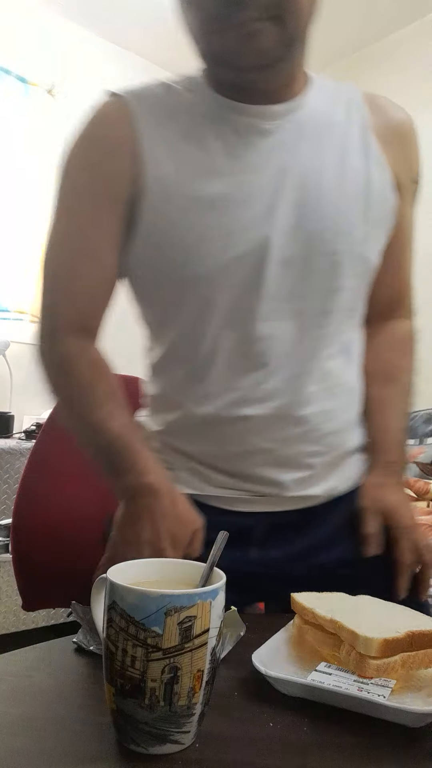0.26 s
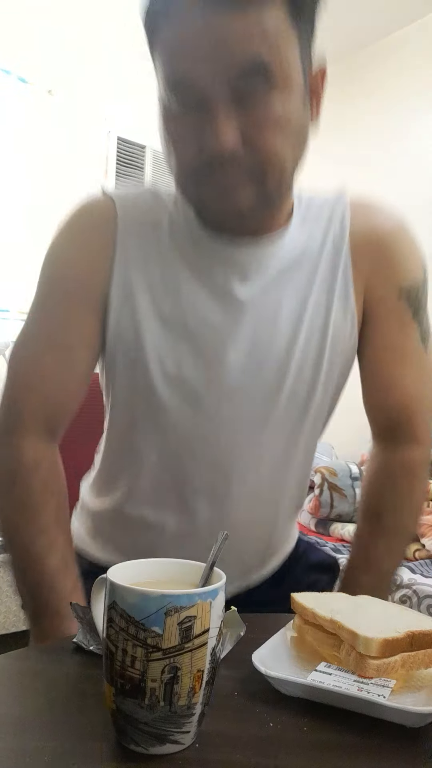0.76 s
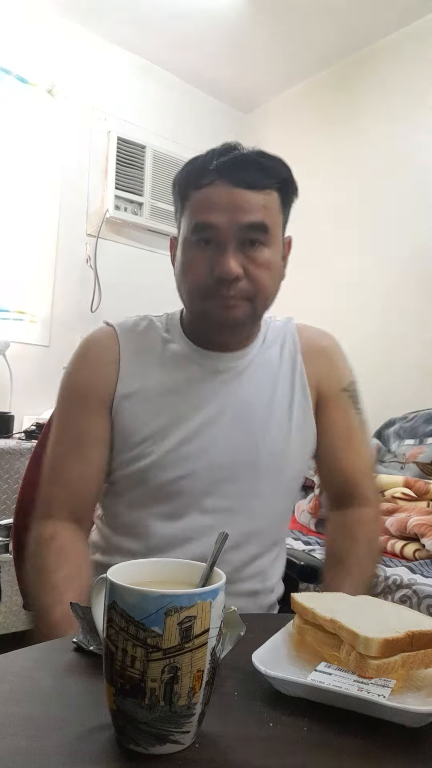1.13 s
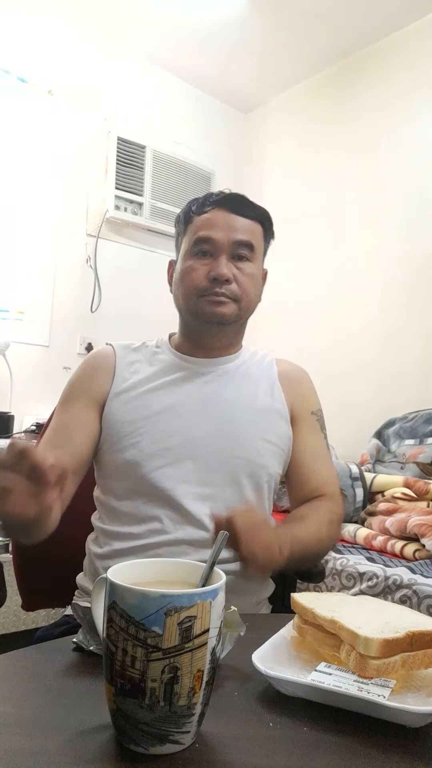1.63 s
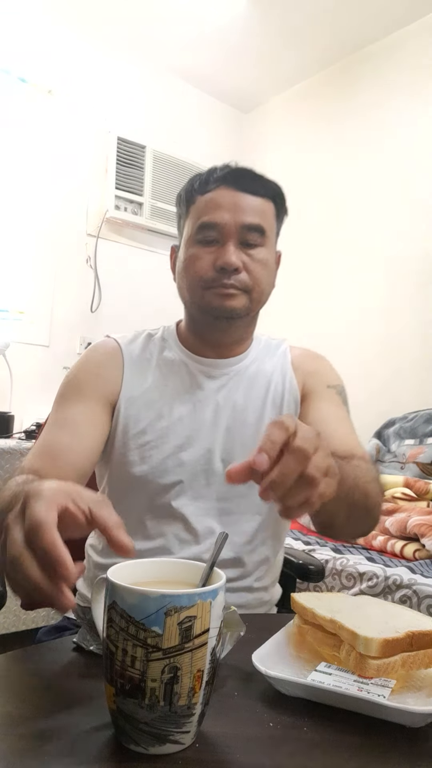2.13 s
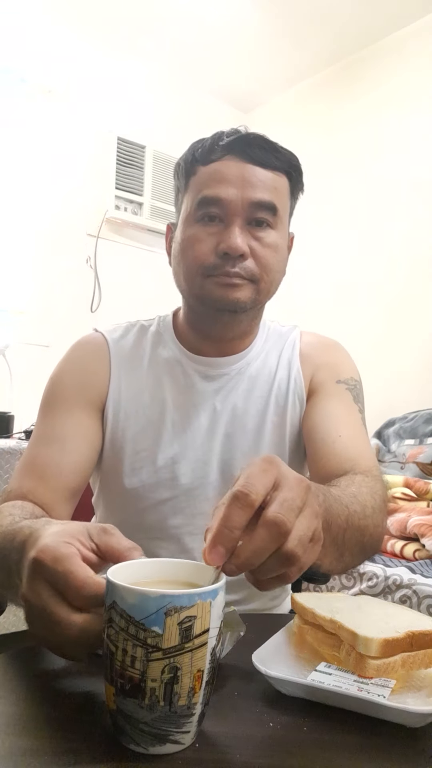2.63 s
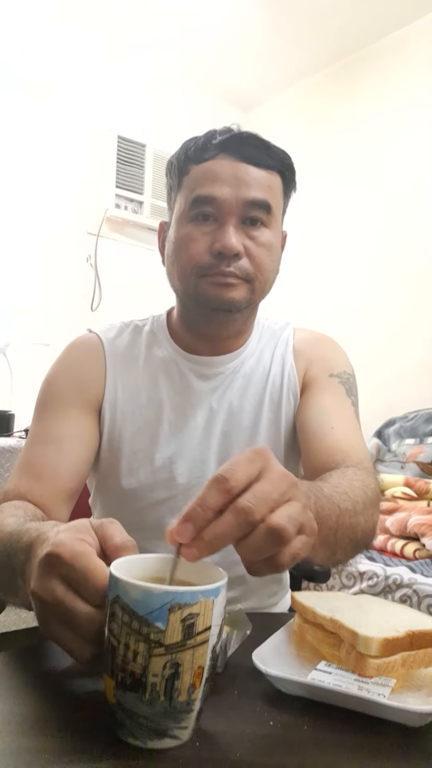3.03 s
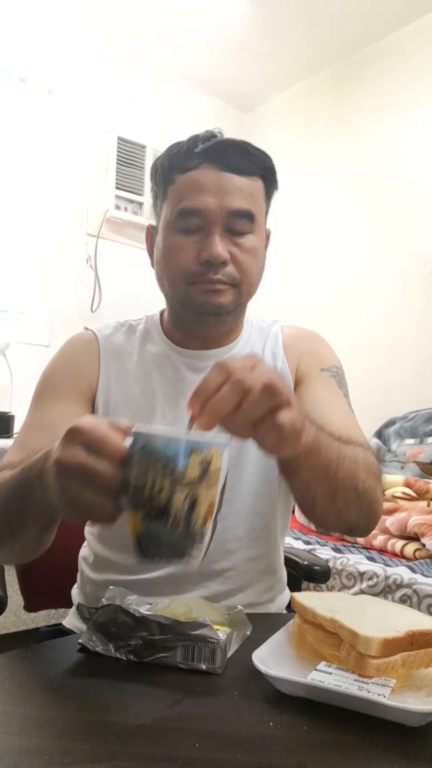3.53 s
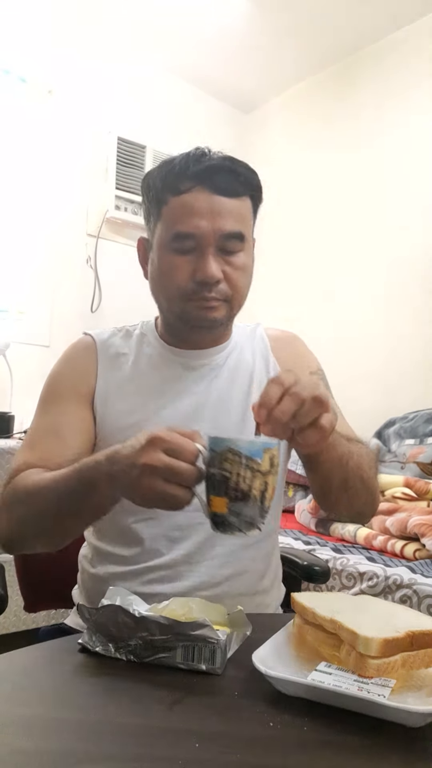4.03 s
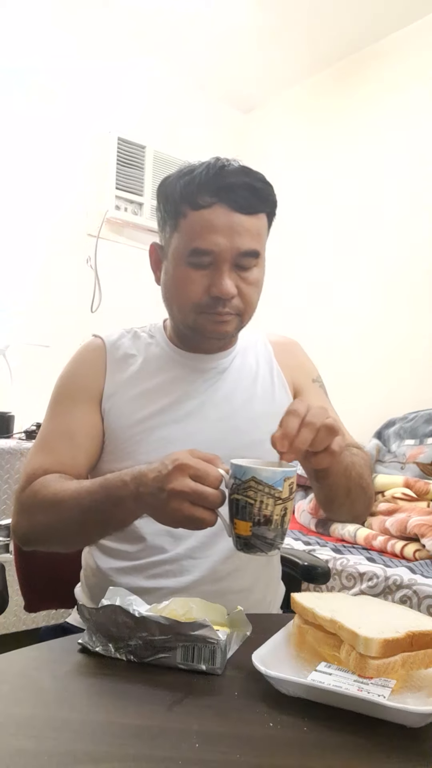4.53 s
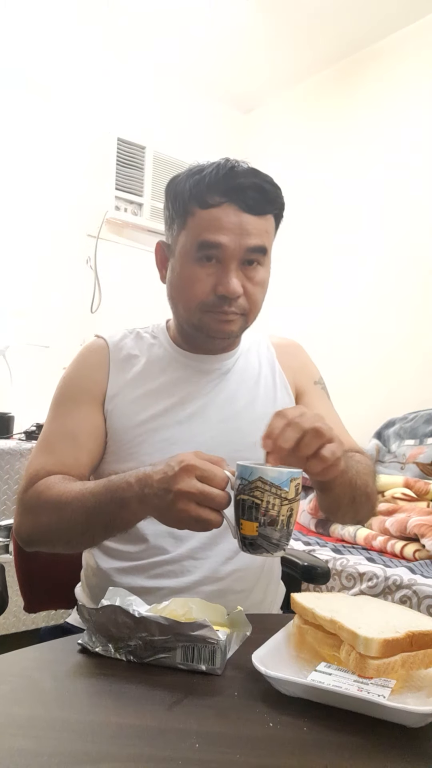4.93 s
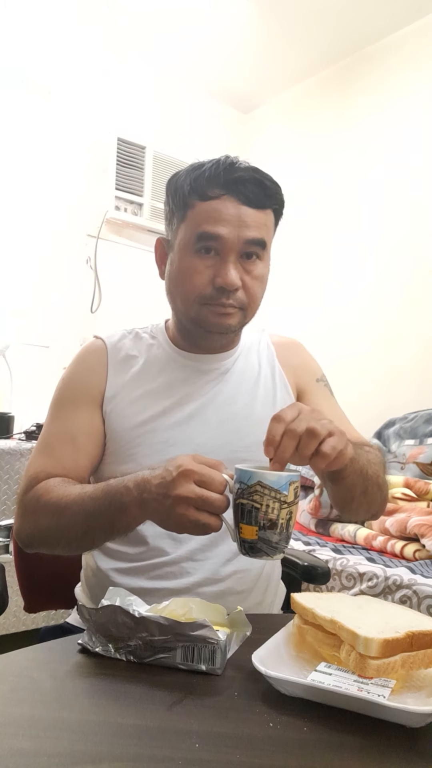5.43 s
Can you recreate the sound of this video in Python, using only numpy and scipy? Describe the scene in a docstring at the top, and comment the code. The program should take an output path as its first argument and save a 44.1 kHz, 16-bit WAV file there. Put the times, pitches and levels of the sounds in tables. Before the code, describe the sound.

A metal spoon clinks lightly in a ceramic mug, after clothes rustle and a chair knocks, over a low air conditioner hum.

```python
"""A metal spoon clinks lightly in a ceramic mug of coffee: each touch is a hard tick and a short ring.
First a man sits down in a small bedroom: his clothes rustle and the chair knocks under him.
The mug slides and bumps on the table, then he lifts it and stirs, his grip damping the ring.
Air conditioning hums throughout; two motors at nearly the same speed make the hum throb."""
import sys
import numpy as np
from scipy import signal
from scipy.fft import rfft, irfft
from scipy.io import wavfile
from scipy.ndimage import uniform_filter1d

SR = 44100
rng = np.random.default_rng(int(sys.argv[2]) if len(sys.argv) > 2 else 0)


def output_pcm(signal):
    """Save a mono or channel-first signal as 16-bit PCM at the path in sys.argv[1].

    Samples are clipped to [-1, 1] before scaling.
    """
    pcm = np.clip(np.atleast_2d(signal).T, -1, 1) * 32767
    wavfile.write(sys.argv[1], SR, np.round(pcm).astype(np.int16))


N = 249606
TIME = np.arange(N) / SR


def from_db(db):
    """Decibels to gain."""
    return 10 ** (np.asarray(db) / 20)


def unit_rms(x):
    """Scale to rms 1."""
    return x / np.sqrt(np.mean(x ** 2) + 1e-20)


def at_time(rows, times=TIME):
    """Read the columns of an automation curve at the given times."""
    known_s, *columns = np.transpose(rows)
    return [np.interp(times, known_s, column) for column in columns]


def at_hz(points, hz):
    """Read a curve on a log-frequency axis."""
    known_hz, values = np.transpose(points)
    return np.interp(np.log(np.maximum(hz, 1)), np.log(known_hz), values)


def tilted(colour, db_per_octave):
    """Brighten or darken a spectrum around 1 kHz."""
    return [(hz, db + db_per_octave * np.log2(hz / 1000)) for hz, db in colour]


def add(track, start_s, sound):
    """Mix a sound into a track from start_s on."""
    start = round(start_s * SR)
    track[..., start:start + sound.shape[-1]] += sound[..., :N - start]


def panned(x, pan_db):
    """Constant-power pan; negative is to the right."""
    gains = from_db(np.array([[pan_db], [-pan_db]]) / 2)
    return x * unit_rms(gains)


def stroke(start_s, length_s, attack_s, release_s):
    """Envelope of one rubbing movement: it swells, holds and dies away."""
    early_s = np.maximum(start_s - TIME, 0)
    late_s = np.maximum(TIME - start_s - length_s, 0)
    return np.exp(-np.minimum(early_s / attack_s + late_s / release_s, 20))


def power_sum(envelopes):
    """Unrelated movements add in power."""
    return np.sqrt(sum(envelope ** 2 for envelope in envelopes))


# Stereo image of diffuse sound: frequency_hz, left_right_correlation
STEREO_CORRELATION = [(60, 0.48), (150, 0.82), (300, 0.67), (600, 0.36), (1200, 0), (16000, 0)]

def diffuse_noise(colour, size=N):
    """Coloured stereo noise at rms 1, narrow in the bass and wide in the treble."""
    hz = np.arange(size // 2 + 1) * SR / size
    mid, side = rfft(rng.standard_normal((2, size)))
    correlation = at_hz(STEREO_CORRELATION, hz)
    stereo = np.sqrt(1 + correlation) * mid + np.sqrt(1 - correlation) * side * [[1], [-1]]
    return unit_rms(irfft(stereo * from_db(at_hz(colour, hz)), size))


# Shaft speeds: slow_motor_hz, fast_motor_hz
MOTOR_HZ = (57.97, 58.83)
# Motor hum: harmonic_number, slow_motor_db, fast_motor_db, beat_peak_s
HUM_HARMONICS = [(1, -54.5, -52, 1.136), (2, -51, -52.5, .349), (3, -67.5, -63.5, .41)]
# Fan rumble and faint hiss: frequency_hz, density_db
FAN_COLOUR = [(25, -23), (40, -24), (52, 11), (82, 4), (105, 5), (200, -10.5), (300, -6.5), (480, -14),
              (800, -24.5), (1600, -34), (3000, -37), (9000, -39), (13000, -33), (15700, -29.5)]

def air_conditioner(fan_db=-54.5, hum_pan_db=-1.0, fan_pan_db=-2.5):
    """Over the fan's rumble, each motor harmonic beats at its own multiple of the speed difference."""
    hum = 0
    for harmonic, slow_db, fast_db, beat_peak_s in HUM_HARMONICS:
        shared_phase = rng.uniform(0, 2 * np.pi)
        for motor_hz, level_db in zip(MOTOR_HZ, (slow_db, fast_db)):
            phase = 2 * np.pi * harmonic * motor_hz * (TIME - beat_peak_s) + shared_phase
            hum = hum + np.sqrt(2) * from_db(level_db) * np.sin(phase)
    fan = from_db(fan_db) * diffuse_noise(FAN_COLOUR)
    return panned(hum, hum_pan_db) + panned(fan, fan_pan_db)


def rubbing(colour, grain_db, grain_samples=150):
    """Two surfaces slide over each other, catching unevenly."""
    catches = unit_rms(uniform_filter1d(rng.standard_normal(N), size=grain_samples))
    return from_db(grain_db * catches) * diffuse_noise(colour)


# Tone of the cloth: frequency_hz, density_db
CLOTH_COLOUR = [(200, 5.5), (1000, -3.5), (2000, 3.5), (4500, 2), (7300, 1), (8300, -6), (10000, -5.5),
                (12000, -0.5), (15500, -8)]
# He steps up, sits down and raises his arms: start_s, length_s, level_db, tilt_db_per_octave
RUSTLES = [(0.041, 0.41, -60, -1.5), (0.273, 0.049, -52.5, 1), (0.506, 0.018, -45, -1),
           (0.616, 0.33, -61, 2.5), (0.98, 0.13, -57.5, 3), (1.177, 0.17, -60, -1),
           (1.384, 0.35, -67.5, 4.5), (1.63, 0.25, -65, 1.5), (1.926, 0.03, -58, 2),
           (2.252, 0.048, -71.5, -1)]

def clothes(attack_s=0.025, release_s=0.037, pan_db=-2.0):
    """Cloth slides over cloth and seat: long airy strokes and a few quick swishes."""
    out = 0
    for start_s, length_s, level_db, tilt in RUSTLES:
        envelope = from_db(level_db) * stroke(start_s, length_s, attack_s, release_s)
        out = out + envelope * rubbing(tilted(CLOTH_COLOUR, tilt), grain_db=0.7)
    return panned(out, pan_db)


def detuned(modes, spread):
    """A changing load shifts every mode a little, differently at each blow."""
    hz, db, t60_s = np.transpose(modes)
    return np.transpose([hz * (1 + spread * rng.standard_normal(len(hz))), db, t60_s])


def ringing(modes, colour, decay_scale=1, scatter_db=5.5, size=SR // 3):
    """A struck body: each blow sets every mode going with a strength of its own."""
    t = np.arange(size) / SR
    hz, db, t60_s = np.transpose(modes)
    strengths = from_db(db + at_hz(colour, hz) + scatter_db * rng.standard_normal(len(hz)))
    polarities = rng.choice([-1, 1], len(hz))
    decay = np.exp(-np.log(1000) * t / (t60_s[:, None] * max(decay_scale, 0.05)))
    return (strengths * polarities) @ (np.sin(2 * np.pi * hz[:, None] * t) * decay)


def contact_noise(colour, contact_s, size=SR // 3):
    """A rough contact makes a burst of noise; the longer the contact, the softer its attack."""
    t = np.arange(size) / SR
    hz = np.arange(size // 2 + 1) * SR / size
    noise = irfft(rfft(rng.standard_normal(size)) * from_db(at_hz(colour, hz)), size)
    return noise * np.exp(-t / contact_s) * (1 - np.exp(-4 * t / contact_s))


# EQ centres of a dull blow: bass_hz, middle_hz, presence_hz, treble_hz
BLOW_BANDS_HZ = (270, 900, 2300, 5500)

def dull_blows(blows, modes, ring_db, scuff_db, scuff_tilt, arch_db, detune):
    """Mid-heavy blows on furniture: a scuff and the body's short ring. Long, soft contacts ring less."""
    out = np.zeros(N)
    mid_arch = [(hz, -arch_db * np.log2(hz / 1000) ** 2) for hz in BLOW_BANDS_HZ]
    for start_s, level_db, tilt, contact_s in blows:
        colour = tilted(mid_arch, tilt)
        hardness = 1 / np.hypot(1, contact_s / 0.019)
        ring = hardness * ringing(detuned(modes, detune), colour)
        add(out, start_s, from_db(level_db + ring_db) * ring)
        bands = tilted(colour, scuff_tilt)
        scuff_colour = [(90, bands[0][1] - 22), *bands, (14000, bands[-1][1] - 17)]  # ends roll off
        add(out, start_s, from_db(level_db + scuff_db) * contact_noise(scuff_colour, contact_s))
    return out


# Resonances of the chair: pitch_hz, level_db, t60_s
CHAIR_MODES = [(245, -7, .1), (320, -3, .08), (400, -5, .05), (470, -8, .07), (522, -7, .13),
               (563, -4, .14), (650, -9, .04), (900, -11, .04), (1054, -6, .05), (1104, -1, .11),
               (1195, -7, .06), (1330, -8, .04), (1750, -11, .025), (2050, -6, .03), (2401, -6, .045),
               (2690, -10, .035), (4113, -7, .035)]
# Knocks as he settles: start_s, relative_level_db, tilt_db_per_octave, contact_s
CHAIR_KNOCKS = [(.960, -44.5, -5.5, 0.035), (1.104, -30, -.5, 0.0074), (1.193, -39, -2, 0.019),
                (1.210, -52, -15.5, 0.005), (1.229, -36, -3.5, 0.0095), (1.246, -46, 6.5, .017),
                (1.379, -43.5, -2, 0.014), (1.510, -53, -7, 0.01)]

def chair(room, direct_db=-2, room_db=-5, pan_db=-2.5):
    """The chair knocks as it takes his weight, and the walls answer."""
    knocks = dull_blows(CHAIR_KNOCKS, CHAIR_MODES, ring_db=-6.5, scuff_db=12.0,
                        scuff_tilt=-2.5, arch_db=2.0, detune=0.027)
    return panned(from_db(direct_db) * knocks + from_db(room_db) * reverb(knocks, room), pan_db)


# Reverb time of the bedroom: frequency_hz, t60_s
ROOM_DECAY = [(150, 0.58), (1000, 0.37), (3000, 0.35), (6000, 0.25), (14000, 0.06)]

def room_response(predelay_s, size=SR // 2):
    """Dense reflections from near walls, dying faster in the treble; unit energy."""
    t = np.arange(size) / SR
    hz = np.arange(size // 2 + 1) * SR / size
    white = rfft(diffuse_noise([(1, 0), (SR, 0)], size=size))
    log_centres = np.log([centre_hz for centre_hz, _ in ROOM_DECAY])
    tail = 0
    for band_weights, (_, t60_s) in zip(np.eye(len(log_centres)), ROOM_DECAY):
        band = irfft(white * np.interp(np.log(hz + 1), log_centres, band_weights), size)
        tail = tail + band * from_db(-60 * t / t60_s)
    fade_in = np.clip(t / predelay_s - 1, 0, 1)
    return unit_rms(tail * fade_in) / np.sqrt(size)


def reverb(x, room):
    """What the walls send back."""
    return signal.fftconvolve(np.atleast_2d(x), room, axes=1)[:, :N]


# Tone of the mug's foot on the table: frequency_hz, density_db
SLIDE_COLOUR = [(100, -9), (200, -7), (380, -4.5), (550, -13.5), (900, -16.5), (1400, -20), (1900, -21),
                (2600, -28.5), (4800, -27.5), (8000, -37), (15000, -40)]
# Pushes of the mug: start_s, length_s, level_db
MUG_SLIDES = [(2.346, 0.034, -61.5), (2.456, 0.18, -66), (2.67, .15, -55), (2.755, 0.021, -51),
              (3.045, 0.017, -47.5)]

def mug_slides(attack_s=0.024, release_s=0.042, pan_db=-6):
    """The mug's foot rubs over the table top with a low, grainy scrape."""
    envelope = power_sum(from_db(level_db) * stroke(start_s, length_s, attack_s, release_s)
                         for start_s, length_s, level_db in MUG_SLIDES)
    return panned(envelope * rubbing(SLIDE_COLOUR, grain_db=2.0), pan_db)


# Resonances of mug and spoon, for drags and clinks alike: pitch_hz, level_db, t60_s
MUG_MODES = [(1930, -1.5, 0.045), (2150, -7, 0.041), (2080, 2.5, 0.28), (2024, -11, 0.16),
             (2340, -22, 0.051), (3920, -12, 0.088), (4240, 0, 0.027), (4760, -6, 0.042),
             (5425, 1.5, 0.047), (5550, -4, 0.14), (5626, 2, 0.083), (5620, -0.5, 0.02), (5840, -3, 0.039),
             (6400, -14, 0.044), (6970, -14, 0.13), (7450, 2, 0.041), (8160, -8, 0.069), (9600, -21, 0.093),
             (11100, -16, 0.073)]
# Drags along the mug's wall: start_s, length_s, low_ring_db, bright_ring_db
SPOON_DRAGS = [(2.52, 0.051, -74, -63), (2.589, 0.061, -56, -54), (3.19, 0.031, -55.5, -77)]

def spoon_drags(slips_per_s=500, attack_s=0.015, release_s=0.011, pan_db=-9):
    """The spoon sticks and slips on the glaze; each slip is a tiny blow on the wall, which it damps."""
    slips = (rng.random(N) < slips_per_s / SR) * rng.standard_normal(N)
    low_colour = [(1950, -21), (2080, 4), (2400, -14), (3500, -40)]
    bright_colour = [(2400, -35), (3800, -8), (4900, -8), (5550, -2), (5800, 2), (6500, -11), (9000, -14)]
    low_body = ringing(MUG_MODES, low_colour, decay_scale=0.74)
    bright_body = ringing(MUG_MODES, bright_colour, decay_scale=0.55)
    low, bright = [unit_rms(signal.fftconvolve(slips, body)[:N]) for body in (low_body, bright_body)]
    out = 0
    for start_s, length_s, low_db, bright_db in SPOON_DRAGS:
        ring = from_db(low_db) * low + from_db(bright_db) * bright
        out = out + stroke(start_s, length_s, attack_s, release_s) * ring
    return panned(out, pan_db)


# EQ centres of a clink: low_ring_hz, dry_tick_hz, bright_ring_hz, top_hz
CLINK_BANDS_HZ = (2083, 4000, 5600, 7800)
# Automation as the mug is lifted into a firm grip: time_s, reverb_send_db, decay_scale
MUG_LIFT = [(2.5, -10, 0.75), (3.3, -7.5, 0.88), (3.75, -5.5, 0.75), (4.3, 2, 0.41), (4.55, 0, 0.63),
            (4.85, -5.5, 0.27), (5.6, -7.5, 0.22)]
# Spoon taps; the spot struck colours the bright ring:
# start_s, relative_level_db, tilt_db_per_octave, bright_ring_db
SPOON_CLINKS = [(2.5666, -54.5, 7, 14.5), (2.5814, -51, 1.5, 6), (2.7217, -54.5, -5, 14),
                (2.7442, -41.5, -0.5, -1), (2.9746, -53.5, -2, 0), (3.264, -46.5, 0.5, -9.5),
                (3.3633, -55.5, -3.5, -7.5), (3.692, -70.5, 7, -9), (3.7323, -61, 2, 4.5),
                (3.7798, -69, -11, 0), (4.0148, -70.5, 7, -10), (4.263, -56.5, 4.5, -5.5),
                (4.438, -71, 9, -5), (4.5137, -54.5, 5, 5), (4.7335, -80, -2, 14), (4.8187, -61.5, -6, -3),
                (4.8862, -57.5, -0.5, 5), (5.0212, -69.5, -11, 15), (5.0474, -68.5, -10, 5),
                (5.0889, -62, -0.5, 18), (5.271, -59, 0, 10.5), (5.405, -68.5, 1, 11),
                (5.4277, -54.5, -2.5, 13.5), (5.5533, -51, -5.5, 4), (5.595, -44.5, -5.5, 8.5)]

def spoon_clinks(tick_db=14, contact_s=0.0018, slosh_detune=0.04, damped_db=-7,
                 free_tick_db=-8.0, grip_tick_db=19, pan_db=-12):
    """Steel ticks on glaze; hand and sloshing coffee damp and detune the ring and bring out the tick."""
    out = np.zeros(N)
    octaves = np.log2(np.array(CLINK_BANDS_HZ) / CLINK_BANDS_HZ[1])
    for start_s, level_db, tilt, spot_db in SPOON_CLINKS:
        _, decay_scale = at_time(MUG_LIFT, start_s)
        damping = 1 - decay_scale
        band_db = tilt * octaves + [0, free_tick_db + grip_tick_db * damping, spot_db, 0]
        modes = detuned(MUG_MODES, slosh_detune * damping ** 3)
        ring = ringing(modes, list(zip(CLINK_BANDS_HZ, band_db)), decay_scale, scatter_db=-0.5)
        _, dry_db, bright_db, top_db = band_db
        tick_colour = [(400, dry_db - 14), (1200, dry_db - 10), (1850, dry_db + 2), (2400, dry_db - 1),
                       (3000, dry_db - 8), (3600, dry_db + 1), (5600, (dry_db + bright_db) / 2 - 1),
                       (8000, top_db - 3), (10000, top_db - 8), (15000, top_db - 13)]
        tick = contact_noise(tick_colour, contact_s)
        clink = from_db(damped_db * damping) * ring + from_db(tick_db) * tick
        add(out, start_s, from_db(level_db) * clink)
    return panned(out, pan_db)


def spoon_in_mug(room, left_delay_s=0.00014, room_pan_db=-2.0):
    """Clinks and drags sound close on the right, and turn wetter as the mug is lifted away."""
    close = spoon_clinks() + spoon_drags()
    send_db, _ = at_time(MUG_LIFT)
    wet = reverb(close.mean(axis=0) * from_db(send_db), room)
    direct = np.array([np.interp(TIME - left_delay_s, TIME, close[0]), close[1]])
    return direct + panned(wet, room_pan_db)


# Resonances of the table top: pitch_hz, level_db, t60_s
TABLE_MODES = [(161.5, -6, 0.2), (270.6, -4, 0.14), (330, 4.5, 0.052), (402, -7, 0.095), (520, -16, .016),
               (710, -2.5, 0.022), (1480, -18, 0.082)]
# Bumps of the mug's foot: start_s, relative_level_db, tilt_db_per_octave, contact_s
MUG_BUMPS = [(2.567, -55, -4, 0.019), (2.693, -51.5, 10.5, .0032), (2.704, -45.5, 6, .0022),
             (2.876, -42, -7.5, 0.0029), (3.024, -60.5, -11.5, 0.023)]

def mug_bumps(room, room_db=-10, pan_db=-8):
    """The mug tips and drops back, and the table top thuds under it."""
    bumps = dull_blows(MUG_BUMPS, TABLE_MODES, ring_db=-1, scuff_db=11.0,
                       scuff_tilt=-8.5, arch_db=1.48, detune=0.0085)
    return panned(bumps + from_db(room_db) * reverb(bumps, room), pan_db)


# Tone of the spoon circling the bottom, muffled by coffee: frequency_hz, density_db
GLIDE_COLOUR = [(300, 0), (1200, -26), (1800, 10), (2150, 8.5), (2500, -8), (3000, -47), (3800, -17),
                (4700, -2.5), (5550, -2), (6500, -5), (8000, -7.5), (12000, -20)]

def spoon_glides(stir_from_s=4.8, length_s=0.017, attack_s=0.0054, release_s=0.073,
                 glide_db=-68, reference_tap_db=-59.5, tap_follow=0.54, pan_db=-1.0):
    """Each stirring tap sends the spoon gliding over the bottom, louder after a harder tap."""
    glides = []
    for start_s, tap_db, *_ in SPOON_CLINKS:
        if start_s > stir_from_s:
            level_db = glide_db + tap_follow * (tap_db - reference_tap_db)
            glides.append(from_db(level_db) * stroke(start_s, length_s, attack_s, release_s))
    return panned(power_sum(glides) * rubbing(GLIDE_COLOUR, grain_db=4.0), pan_db)


def scene():
    """All sources in one small bedroom."""
    room = room_response(predelay_s=0.0025)
    return (air_conditioner() + clothes() + chair(room)
            + mug_bumps(room) + mug_slides() + spoon_in_mug(room) + spoon_glides())


def record(dry, dip_hz=3210, dip_width_hz=1300, dip_db=-3.3, cutoff_hz=15900):
    """The microphone dips in the presence range; the top is cut steeply."""
    presence = signal.lfilter(*signal.iirpeak(dip_hz, dip_hz / dip_width_hz, fs=SR), dry)
    dipped = dry + (from_db(dip_db) - 1) * presence
    high_cut = signal.ellip(12, 0.1, 80, cutoff_hz, fs=SR, output="sos")
    return signal.sosfilt(high_cut, dipped)


dry = scene()
out = record(dry)
output_pcm(out)
```